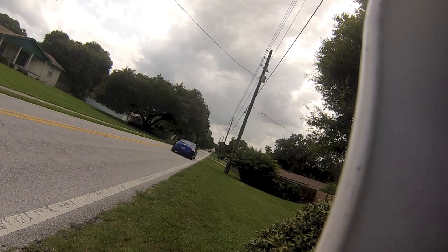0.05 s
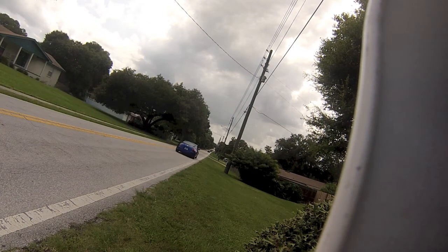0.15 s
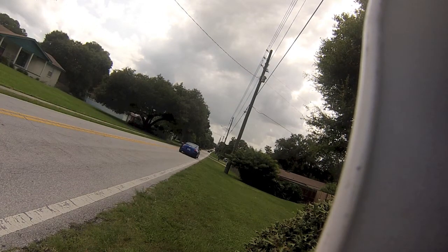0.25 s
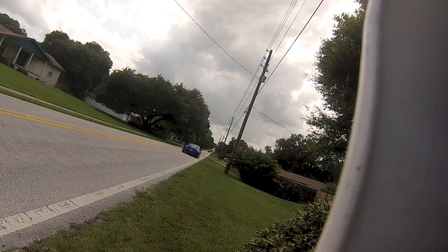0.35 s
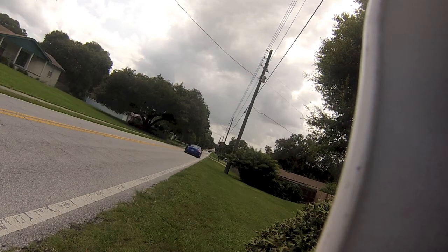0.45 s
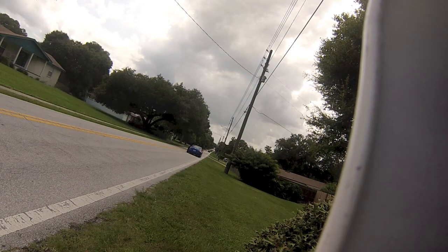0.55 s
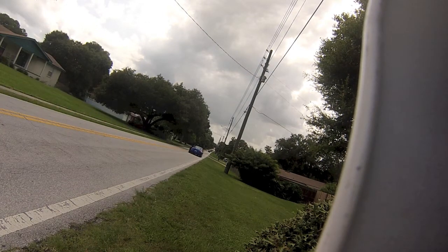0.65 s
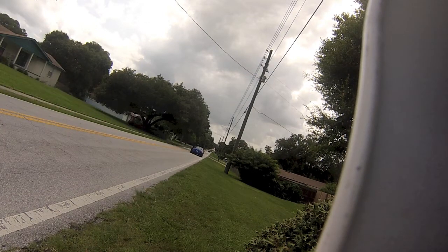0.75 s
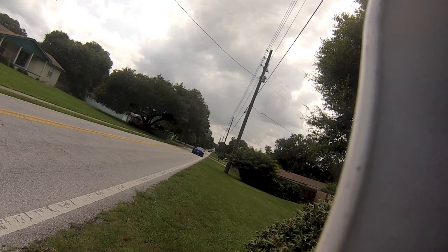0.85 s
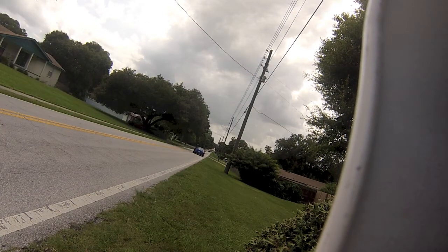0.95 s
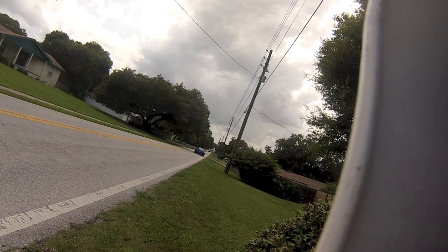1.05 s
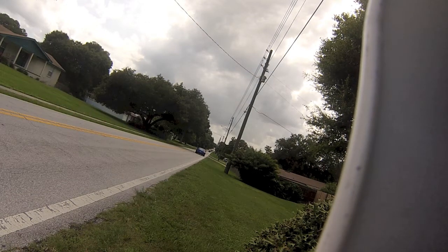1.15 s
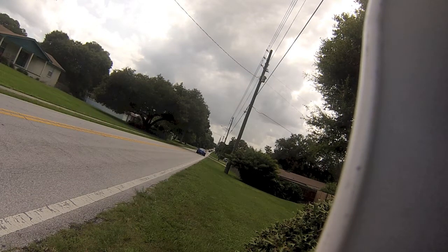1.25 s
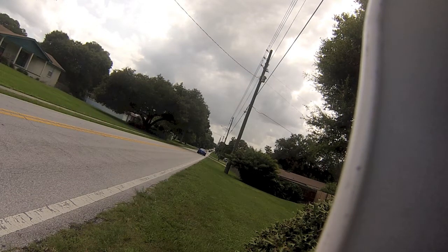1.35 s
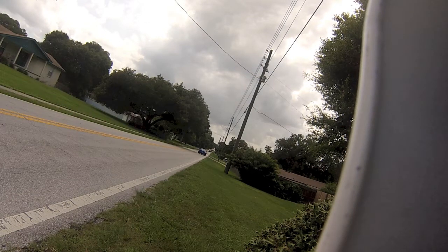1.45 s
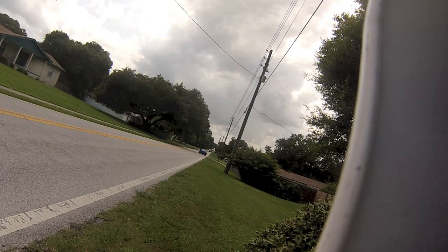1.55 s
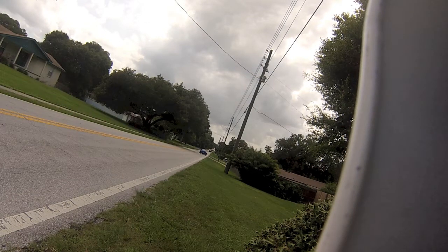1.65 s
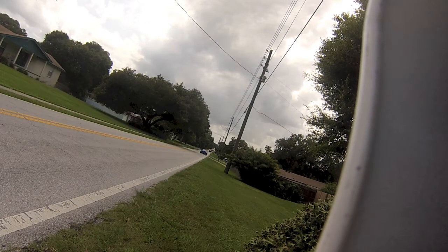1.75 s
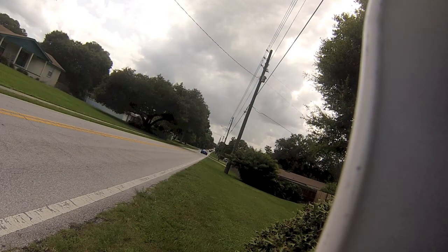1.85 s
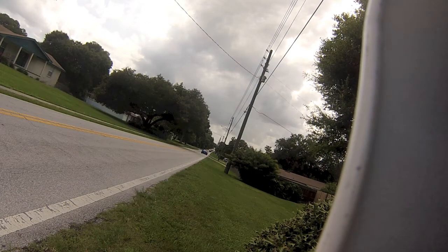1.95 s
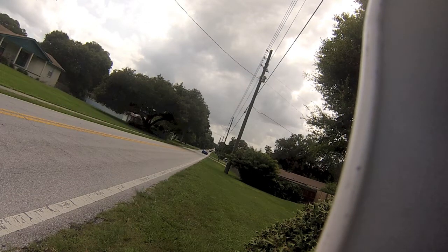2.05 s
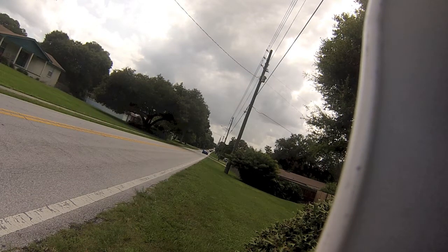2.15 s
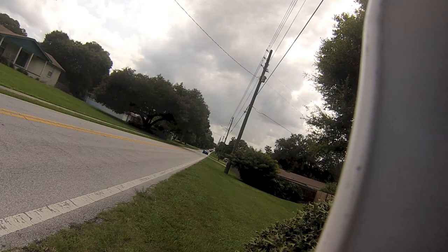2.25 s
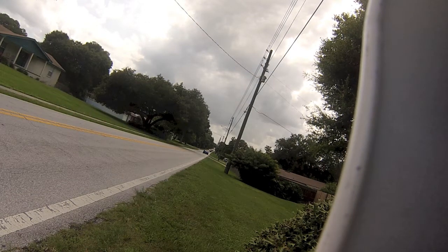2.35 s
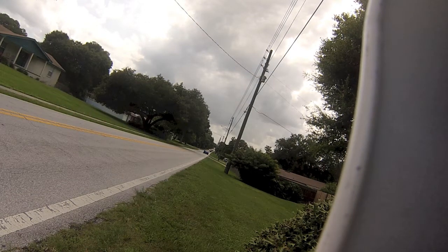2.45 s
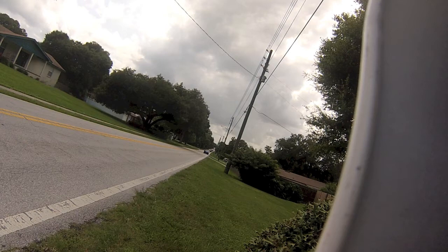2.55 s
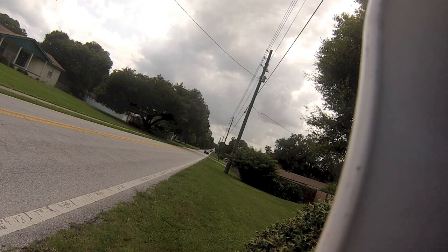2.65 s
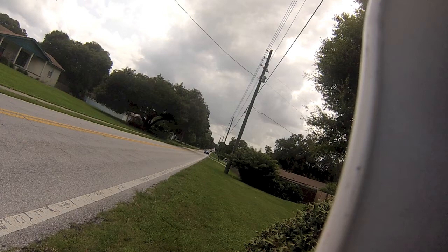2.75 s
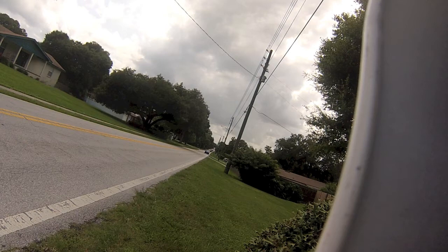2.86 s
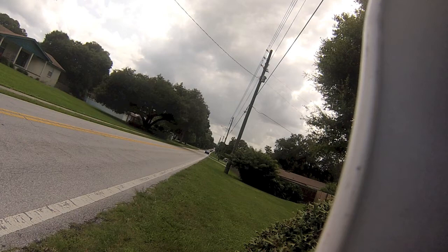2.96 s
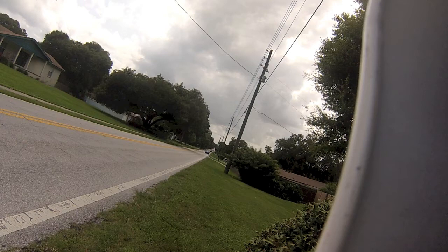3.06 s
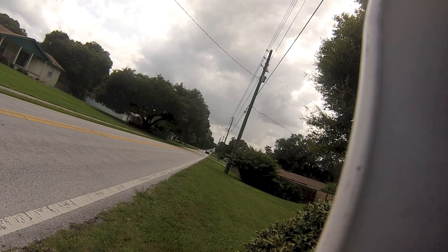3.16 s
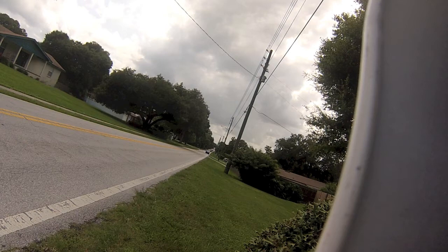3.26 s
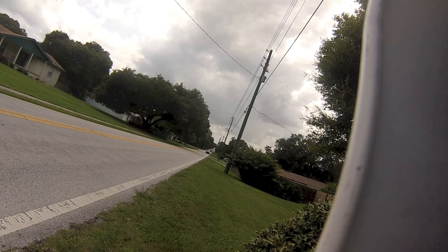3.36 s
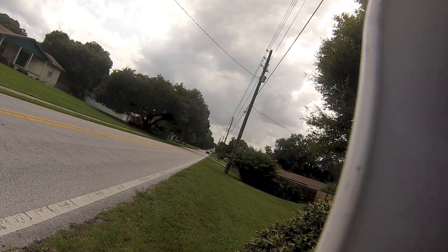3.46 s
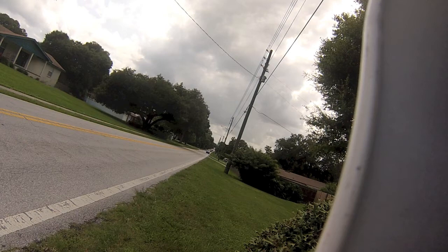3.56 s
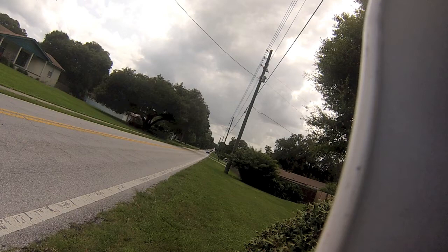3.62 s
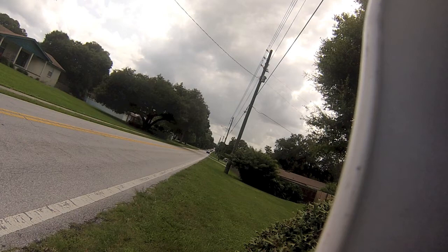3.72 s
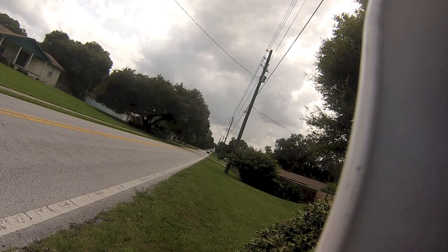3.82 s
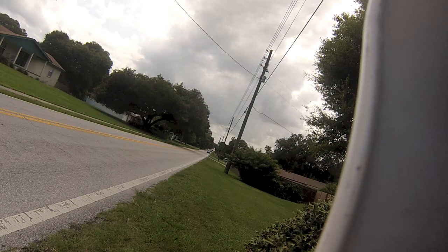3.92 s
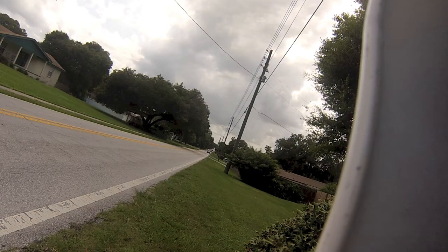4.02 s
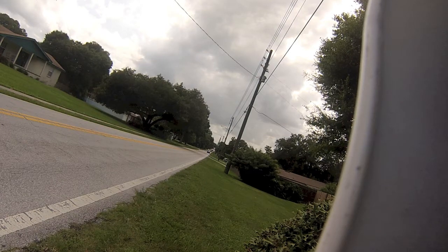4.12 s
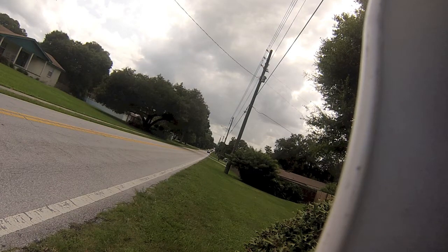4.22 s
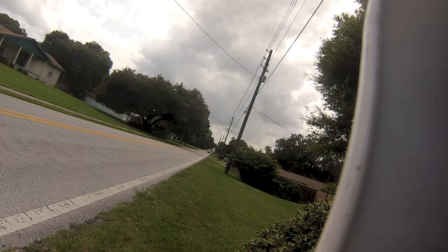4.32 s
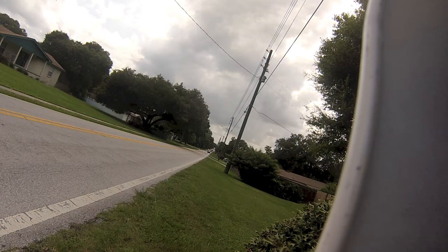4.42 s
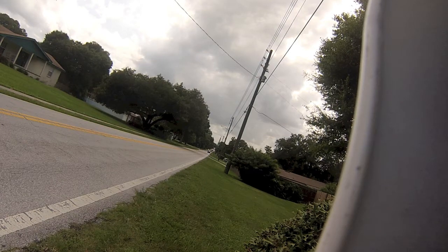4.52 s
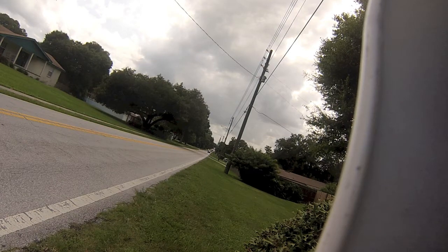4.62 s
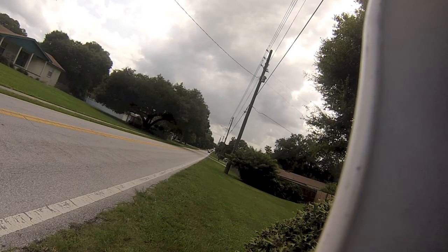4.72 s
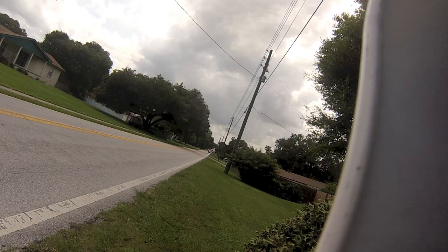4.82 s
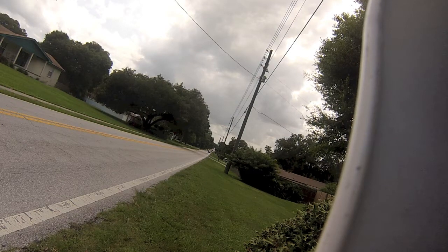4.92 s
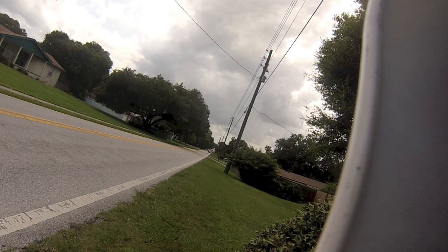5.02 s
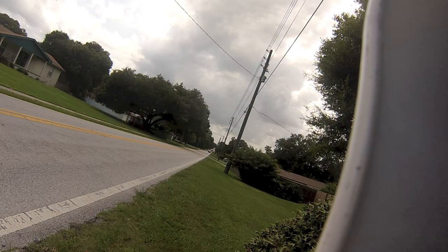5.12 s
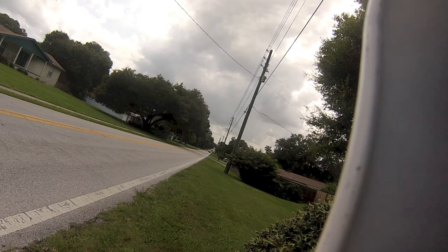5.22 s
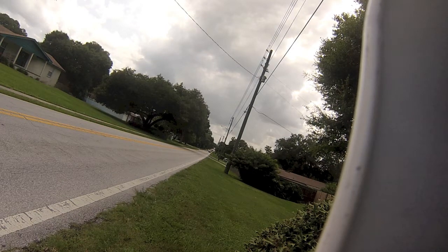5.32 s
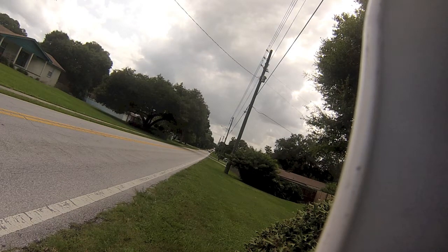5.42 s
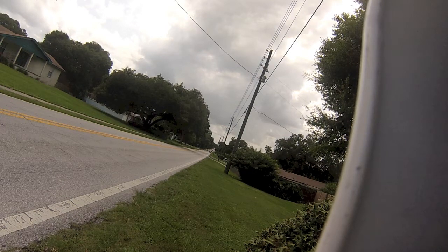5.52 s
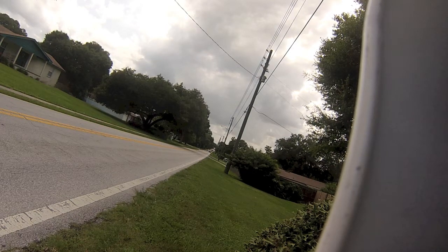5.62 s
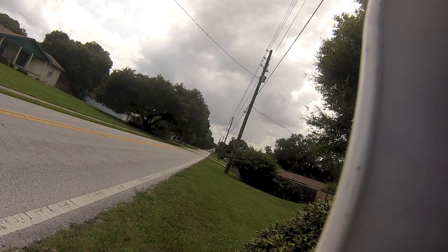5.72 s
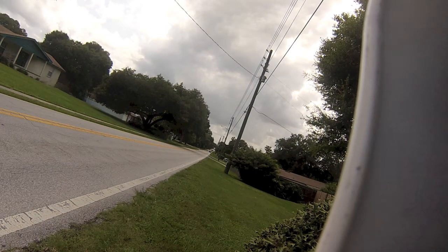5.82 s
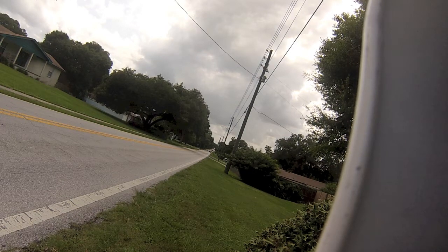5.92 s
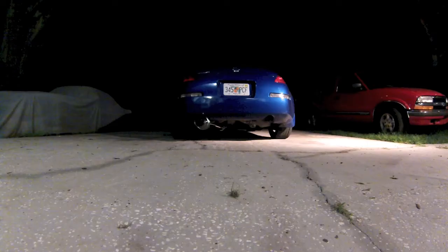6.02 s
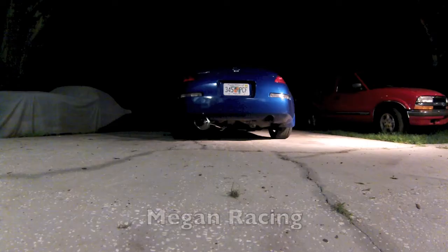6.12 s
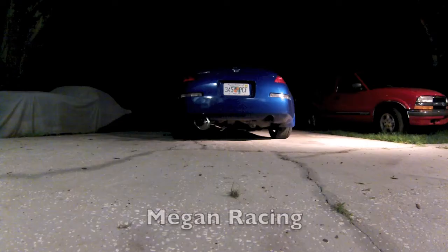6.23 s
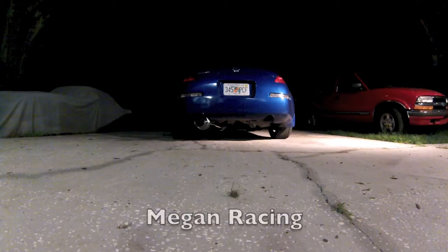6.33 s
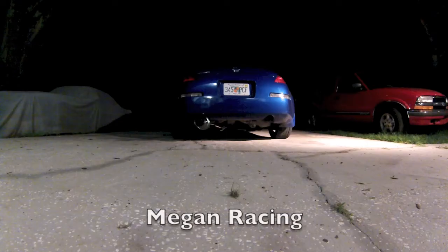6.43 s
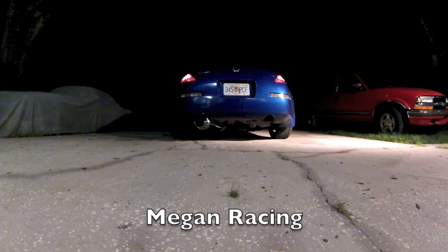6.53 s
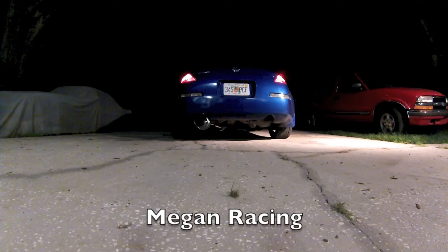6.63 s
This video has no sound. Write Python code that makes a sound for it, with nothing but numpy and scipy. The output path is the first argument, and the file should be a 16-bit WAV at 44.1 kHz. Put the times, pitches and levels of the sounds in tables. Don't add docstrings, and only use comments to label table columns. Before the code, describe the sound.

A droning, slightly raspy car exhaust speeds into the distance, with airy tyre roar coloured by the camera's hard housing and faint reflections from houses. The note rises, burbles briefly off throttle, falls for the next gear and dwindles as a second vehicle approaches. Then near silence at night: distant hum, throbbing insects, a small key click, the starter's clanking gear, rough whirring and a low puff of exhaust as cranking begins.

```python
import sys
import numpy as np
from scipy import signal
from scipy.io import wavfile
from scipy.ndimage import uniform_filter1d

SR = 44100
rng = np.random.default_rng(int(sys.argv[2]) if len(sys.argv) > 2 else 0)


def volts_from_db(level):
    exponent = np.asarray(level, float) / 20
    return 10 ** exponent


def master(y):
    cut = np.clip(np.atleast_2d(y).T, -1, 1)
    pcm = np.round(cut * 32767)
    wavfile.write(sys.argv[1], SR, pcm.astype(np.int16))


N = 294588
T = np.arange(N) / SR

# (time [s], amount [0-1])
COASTING = [
    (2.2, 0),
    (2.35, 1),
    (2.9, 0.95),
    (3.05, 0.56),
    (3.3, .45),
    (3.5, 0.23),
    (4.4, 0.49),
    (4.7, 0.92),
]
# (pitch [Hz], width [Hz], level [dB])
HOUSING = [(514, 100, 3.5), (592, 86, -13), (834, 138, 6.5), (922.5, 70, -15), (1148, 197, 6.5),
           (1306, 150, -3), (1552, 195, 5), (1724, 60, 1), (1833, 102, 6.5), (1913, 73, 1),
           (2280, 163, -9.5), (2488, 154, -8.5), (2670, 150, 2.5), (2835, 60, -1), (2997, 95, 4.5),
           (3820, 270, -5), (4120, 480, -1.5), (5440, 570, 4.5), (6060, 330, 2.5), (7240, 910, 4),
           (8900, 460, -2), (9950, 700, 4.5)]
# (time [s], level [dB])
ONCOMING_DB = [(3.0, -76), (4.3, -51), (4.8, -47), (5.3, -40), (5.7, -36), (6.05, -31.5)]
# (pitch [Hz], width [Hz], level [dB])
CASING = [(503, 120, 3.5), (996, 220, 5.5), (2020, 210, 4.5), (2840, 300, 6), (2980, 230, 3),
          (3420, 300, 2)]


def evened(x):
    return x / np.sqrt(np.mean(x ** 2) + 1e-20)


def columns(rows):
    s, *values = np.transpose(rows)
    return [np.interp(T, s, v) for v in values]


def drift(span_s):
    span = max(int(span_s * SR), 2)
    once = uniform_filter1d(rng.standard_normal(N), span)
    return evened(uniform_filter1d(once, span))


def bumps_db(bumps, where):
    return sum(db * np.exp(-(2 * (where - centre) / width) ** 2) for centre, width, db in bumps)


def noise(points, bumps=(), patchy_db=0., size=1024):
    hz = np.fft.rfftfreq(size, 1 / SR)
    real, imaginary, patches = rng.standard_normal((4 * N // size + 5, len(hz), 3)).T
    patches = uniform_filter1d(patches, size // 128, 0)
    patches = evened(uniform_filter1d(patches, 8192 // size, 1))
    f, db = np.transpose(points)
    colour_db = np.interp(np.log(hz + 1), np.log(f + 1), db, left=-80, right=-80)
    colour_db += bumps_db(bumps, hz)
    spectra = (real + 1j * imaginary) * volts_from_db(colour_db[:, None] + patchy_db * patches)
    return evened(signal.istft(spectra, nperseg=size, noverlap=3 * size // 4)[1][:N])


def resonate(x, hz, width):
    turn = np.exp(2j * np.pi * np.cumsum(hz * np.ones(N)) / SR)
    r = np.exp(-np.pi * width / SR)
    return 2 * (turn * signal.lfilter([1 - r], [1, -r], x / turn)).real


def band(hz, width):
    return evened(resonate(resonate(rng.standard_normal(N), hz, width), hz, width))


def dying(s, db, t60, rise_s=0.0011):
    since = np.maximum(T - s, 0)
    return volts_from_db(db - 60 * since / t60) * (1 - np.exp(-since / rise_s))


def ringing(s, db, hz, t60, rise_s):
    return dying(s, db, t60, rise_s) * np.sin(2 * np.pi * hz * (T - s))


def echoes(share, t60, first_s=0.):
    t = T[:SR // 2]
    present = (rng.random(len(t)) < share) * (t > first_s)
    taps = rng.standard_normal(len(t)) * present * volts_from_db(-60 * t / t60)
    return taps / np.linalg.norm(taps)


def distance_db():
    doubling_s, gaining_s = 0.82, 2.64
    return -20 * np.log10(1 + T / doubling_s + (T / gaining_s) ** 2)


def traffic(steady_db, near_db, share, shut_db, wake_db, closest_db, growth):
    wake = np.exp(-T / 0.048)
    leaving_db = near_db + share * distance_db() + shut_db * columns(COASTING)[0] + wake_db * wake
    nearing_db = closest_db + growth * (columns(ONCOMING_DB)[0] - ONCOMING_DB[-1][1])
    return np.sqrt(volts_from_db(steady_db) ** 2 + volts_from_db(leaving_db) ** 2 + volts_from_db(nearing_db) ** 2)


def engine():
    # (time [s], firing rate [Hz], level [dB])
    pulling_away = [(0.0, 193.2, -16.5), (.2, 205.4, -14), (.34, 208.2, -12.5), (.5, 218.6, -14),
                    (.8, 231, -20), (1.4, 251.7, -23.5), (1.75, 267, -31), (1.9, 275, -43),
                    (2.3, 288.9, -48), (2.5, 268.2, -44.5), (2.7, 253.6, -37), (2.89, 240.3, -34),
                    (3.0, 210.2, -29), (3.05, 204.5, -23), (3.2, 210.5, -24), (3.8, 221.7, -33.5),
                    (4.45, 230.3, -35), (4.7, 235.4, -46.5)]
    # (time [s], length [s], level [dB])
    cancels = [
        (.32, 0.1, -6.5),
        (.65, 0.17, -6),
        (1.04, 0.12, -5.5),
        (1.22, 0.23, -7),
        (1.52, .12, -6.5),
    ]
    # (multiple, near level [dB], share of distance loss, throttle shut [dB])
    strong_orders = [(.5, -32, 0.9, -12), (2, -44.5, 0.52, -19), (3, -43, 0.75, -10)]
    # (multiple, level against the half order [dB], extra loss while leaving [dB/s])
    weak_orders = [(1 / 3, -13.5, -1), (2 / 3, -10, -0.4), (5 / 6, -18.5, -0.9), (7 / 6, -8.5, 6.5),
                   (11 / 6, -22, -1.3), (8 / 3, -23, -4), (4, -14.5, -0.5), (5, -9, 10.5), (6.5, -17, 0.5)]
    # (pitch [Hz], width [Hz], level [dB])
    outlet = [(141, 25, 2), (426.5, 36, 4), (482, 42.2, 18), (523.3, 46, 15.5), (575, 23, -7), (592, 22, 5),
              (632, 36, -4), (697.7, 30, 9.5), (848, 46, 8)]
    # (pitch [Hz], width [Hz], level [dB])
    pipe = [(171.4, 22, 8), (223, 60, 14), (497, 46, 17.5), (844, 116, 8), (1012, 210, 4)]
    wobble, flutter_db, ragged_db, misfire_db, echo_db = .002, 0.71, 2.5, 2.6, -19.5

    hz, tone_db = columns(pulling_away)
    shut = columns(COASTING)[0] ** 3
    tone_db = tone_db + bumps_db(cancels, T) + misfire_db * shut * drift(0.017)
    half_db, second_db, third_db = [
        db + share * distance_db() + shut_db * shut + bumps_db(outlet, k * hz)
        for k, db, share, shut_db in strong_orders]
    phase = 2 * np.pi * np.cumsum(hz * (1 + wobble * drift(0.019))) / SR

    steady = [(1, tone_db), (.5, half_db), (2, second_db)]
    ragged = [(3, third_db)]
    for k, db, loss_db in weak_orders:
        ragged.append((k, half_db + db - loss_db * T + bumps_db(pipe, k * hz)))
    air = [drift(.015), drift(.03), drift(0.016)]
    x = np.zeros(N)
    for k, db in steady:
        x += volts_from_db(db + flutter_db * air[0]) * np.cos(k * phase + 2 * np.pi * rng.random())
    for i, (k, db) in enumerate(ragged):
        x += volts_from_db(db + ragged_db * air[i % 3]) * np.cos(k * phase + 2 * np.pi * rng.random())
    x = np.sqrt(2) * x * np.clip((pulling_away[-1][0] - T) / 0.079, 0, 1)
    return x + volts_from_db(echo_db) * signal.fftconvolve(x, echoes(0.022, 0.65))[:N], phase


def road(phase):
    # (pitch [Hz], level [dB per Hz])
    roar_colour = [(250, -35), (330, -16.5), (600, -11), (760, -6), (1000, -5), (1500, -13.5),
                   (2200, -22.5), (3500, -26), (6000, -48)]
    rasp_colour = [(1200, -15), (2200, 2.5), (3000, -0.5), (5000, -4), (6500, -11.5), (8500, -22),
                   (11000, -48)]
    fizz_colour = [(6000, -7), (8000, 4.5), (10000, 5.5), (12000, 2), (14000, -10), (15300, -8)]
    rumble_colour = [(20, 1), (60, 1), (150, -4), (240, 2.5), (290, -32.5), (400, -44)]
    # (steady traffic [dB], leaving car when near [dB], share of the distance loss,
    # throttle shut [dB], wake [dB], nearing car at its closest [dB], share of its growth)
    roar_levels = (-42, -39.5, 0.16, 1.5, 11.5, -36.5, 1.2)
    rasp_levels = (-76, -43, .5, -5.5, 1.5, -44, 1.13)
    fizz_levels = (-76.5, -55, 0.96, -5.5, 6.5, -65, 1)
    rumble_levels = (-49.5, -39.5, 0.77, 5, -5, -41, 0.5)

    puffing = 1 + 0.13 * np.cos(phase)
    gust = volts_from_db(0.73 * drift(0.083))
    roar = traffic(*roar_levels) * noise(roar_colour, HOUSING, 1.24, size=2048)
    rasp = traffic(*rasp_levels) * noise(rasp_colour, HOUSING, 0.71) * puffing
    fizz = traffic(*fizz_levels) * noise(fizz_colour, HOUSING, 2.1) * puffing
    fizz *= volts_from_db(0.43 * drift(0.045))
    x = (roar + rasp + fizz) * gust
    x = x + volts_from_db(-12.0) * signal.fftconvolve(x, echoes(.004, 0.22, .006))[:N]
    rumble = traffic(*rumble_levels) * volts_from_db(4.5) * noise(rumble_colour, (), 1.1, size=2048)
    return x + rumble


def exhaust_boom():
    # (pitch [Hz], level [dB per Hz])
    boom_colour = [(200, -13), (260, 0.5), (310, -6.5), (380, -1.5), (480, 1.5), (620, -3), (850, -4),
                   (1050, -1), (1300, -31)]
    # (steady traffic [dB], leaving car when near [dB], share of the distance loss,
    # throttle shut [dB], wake [dB], nearing car at its closest [dB], share of its growth)
    boom_levels = (-55, -31, 1.12, -7, 0, -39.5, 1)
    return traffic(*boom_levels) * noise(boom_colour, HOUSING[:4], 2.3, size=2048)


def whistles():
    # (pitch [Hz], width [Hz], level [dB], loudest at [s], lasts [s])
    lip_tones = [
        (7750, 260, -70, 1.4, .6),
        (8620, 110, -73, 1.0, 1.6),
    ]
    x = np.zeros(N)
    for hz, width, db, s, span in lip_tones:
        swell = np.exp(-(2 * (T - s) / span) ** 2)
        x += volts_from_db(db + 1.5 * drift(.05)) * swell * band(hz, width)
    return x


def oncoming_car():
    # (pitch [Hz], level [dB per Hz])
    hum_colour = [(150, -1), (220, 5), (300, -28), (390, 3), (520, -28), (700, 3), (820, 3), (1000, -46),
                  (1400, -17)]
    return volts_from_db(columns(ONCOMING_DB)[0]) * noise(hum_colour, (), 1.0, size=2048)


def starter_engages():
    # (time [s], level [dB], t60 [s])
    blows = [
        (6.377, -43, 0.34),
        (6.3875, -35.5, 0.17),
        (6.4193, -33.5, 0.086),
        (6.426, -36, 0.2),
        (6.449, -50, 0.11),
    ]
    # (pitch [Hz], level [dB per Hz])
    clank_colour = [(100, -22), (250, -22), (500, -7.5), (1100, 0.5), (1900, 1), (2800, -7.5), (4200, -1.5),
                    (5500, -11.5), (10000, -17), (15300, -20)]
    # (time [s], level [dB])
    strikes = [
        (6.388, -22.5),
        (6.397, -30),
        (6.4200, -23),
        (6.424, -23),
        (6.425, -26),
        (6.4453, -31),
        (6.452, -36),
    ]
    # (pitch [Hz], level [dB], t60 [s])
    pinion = [(1050, -21, 0.022), (1350, -2, 0.031), (2790, 2.5, 0.026), (3720, -1, 0.022),
              (7050, -8, 0.011), (9700, -9, .008)]
    # (time [s], level [dB], pitch [Hz], width [Hz], t60 [s])
    thud = (6.415, -38, 250, 160, .6)

    x = sum(dying(*blow) for blow in blows) * volts_from_db(1.5 * drift(0.0012))
    x *= noise(clank_colour, CASING, 1.5, size=256)
    for s, strike_db in strikes:
        for hz, db, t60 in pinion:
            x += ringing(s, strike_db + db - 8.0, hz * rng.uniform(0.97, 1.04), t60, .0001)
    s, db, hz, width, t60 = thud
    return x + dying(s, db, t60, 0.013) * band(hz, width)


def starter_turns():
    # (time [s], gear tooth rate [Hz], whine level [dB])
    turning = [(6.39, 301, -65), (6.47, 327, -45), (6.495, 338.7, -54), (6.52, 387, -43), (6.55, 429, -48),
               (6.575, 495, -45), (6.605, 516, -42), (6.64, 483, -40.5), (6.68, 417, -36)]
    # (multiple of the tooth rate, level [dB])
    mesh = [(1, -9.5), (2, -7.5), (3, -14), (4, -8), (6, -14), (7, -15), (8, -3), (10, -19), (12, -23)]
    # (pitch [Hz], level [dB per Hz])
    grind_colour = [(100, -11), (250, -9), (340, -15), (560, -11), (800, -2.5), (1000, -5), (1400, -5.5),
                    (2000, -6), (2500, -12), (3200, -6), (4500, -13.5), (15300, -33)]

    hz, whine_db = columns(turning)
    phase = 2 * np.pi * np.cumsum(hz * (1 + .009 * drift(.003))) / SR
    whine = np.zeros(N)
    for k, db in mesh:
        rough_db = 3.4 * drift(0.0028)
        whine += volts_from_db(db + bumps_db(CASING, k * hz) + rough_db) * np.sin(k * phase)
    grind_db = -40.5 + 2.1 * (T > 6.565)
    grind = volts_from_db(grind_db) * noise(grind_colour, CASING, 1.8, size=512)
    return (T > turning[0][0]) * (volts_from_db(whine_db) * whine + grind)


def tailpipe_puffs():
    puffs = [
        (6.557, -23.5, 63, 0.13),
        (6.557, -31, 41, 0.084),
        (6.578, -33, -69, .08),
        (6.597, -27, 30, 0.27),
    ]
    return -sum(ringing(s, db, hz, t60, 0.0023) for s, db, hz, t60 in puffs)


def key():
    # (time [s], level [dB], pitch [Hz], t60 [s], rise [s])
    knocks = [
        (6.209, -32, 530, 0.048, 0.0052),
        (6.211, -41, 720, 0.035, 0.0016),
        (6.21, -42, 90, .05, 0.0023),
    ]
    # (time [s], level [dB], pitch [Hz], width [Hz], t60 [s])
    cabin = (6.228, -48, 575, 55, .34)
    s, db, hz, width, t60 = cabin
    return dying(s, db, t60, 0.013) * band(hz, width) + sum(ringing(*knock) for knock in knocks)


def night():
    # (pitch [Hz], level [dB per Hz])
    hum_colour = [(25, -4), (100, -9.5), (200, -20.5), (400, -27.5), (700, -31.5), (1500, -35.5),
                  (3500, -42), (6000, -46), (15000, -48.5)]
    # (pitch [Hz], width [Hz], level [dB], throbs [per s], falls quiet at [s])
    insects = [
        (6780, 500, -61.5, 57, 6.9),
        (3050, 130, -72, 24.974, 6.25),
        (5607, 150, -88, 30, 6.9),
    ]
    x = volts_from_db(-49.5) * noise(hum_colour, (), 1.4)
    for hz, width, db, throb, end in insects:
        singing = volts_from_db(db + 1.4 * drift(0.029) - 60 * np.maximum(T - end, 0))
        x += singing * band(hz, width) * (1 + 0.24 * np.sin(2 * np.pi * throb * T))
    return x


def treetops():
    # (pitch [Hz], width [Hz], level [dB])
    far_insects = (10460, 520, -73.5)
    hz, width, db = far_insects
    return volts_from_db(db) * band(hz, width)


def hiss():
    # (pitch [Hz], level [dB per Hz])
    hiss_colour = [(9000, -15), (11500, -3), (13000, 0.3), (15300, -1)]
    return volts_from_db(-81.5) * noise(hiss_colour)


def scene():
    # (from [s], to [s])
    fade_out = (5.953, 6.051)
    fade_in = (6.056, 6.17)
    car, phase = engine()
    day = car + road(phase) + exhaust_boom() + whistles() + oncoming_car() + treetops() + hiss()
    dark = starter_engages() + starter_turns() + tailpipe_puffs() + key() + night()
    mix = day * np.interp(T, fade_out, [1, 0]) + dark * np.interp(T, fade_in, [0, 1])
    return mix[None]


def roll_off(x):
    return signal.sosfilt(signal.butter(12, 15200, fs=SR, output="sos"), x)


def record(dry):
    return roll_off(dry)


dry = scene()
out = record(dry)
master(out)
```